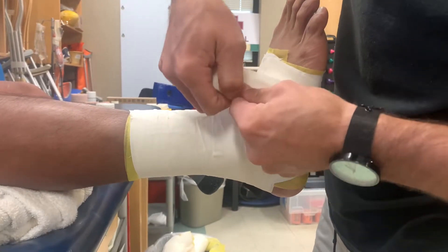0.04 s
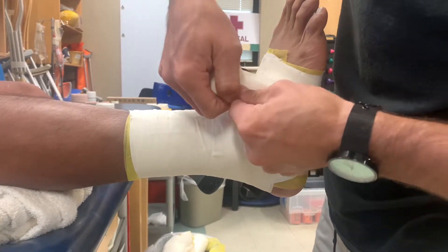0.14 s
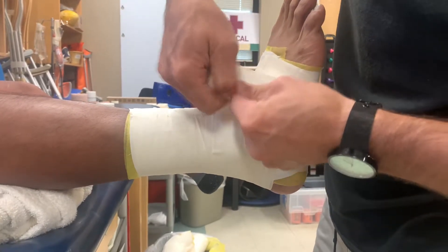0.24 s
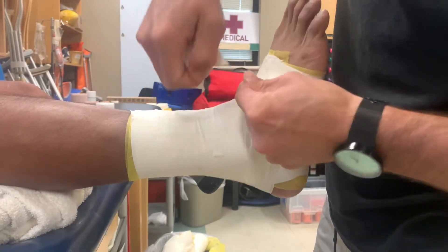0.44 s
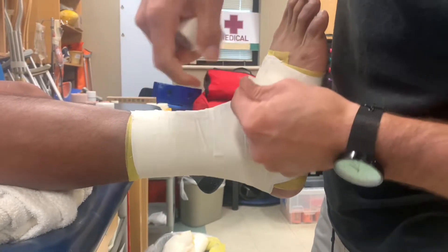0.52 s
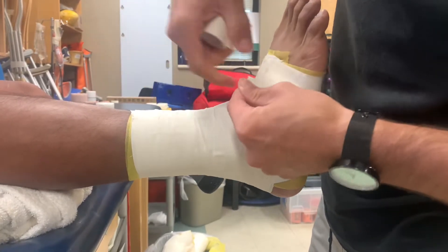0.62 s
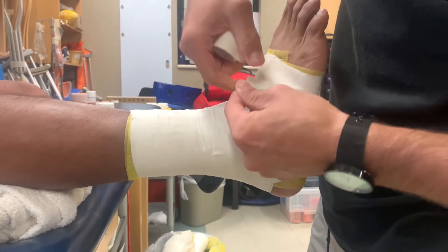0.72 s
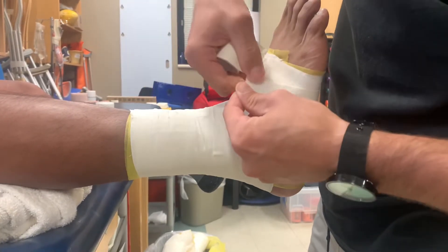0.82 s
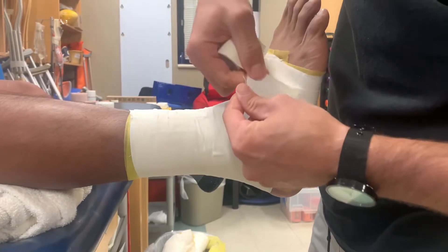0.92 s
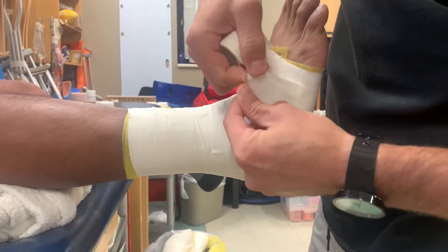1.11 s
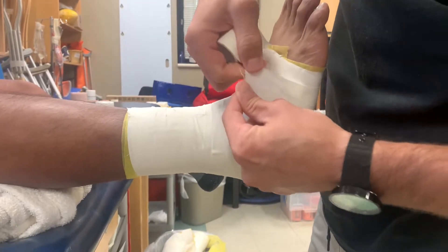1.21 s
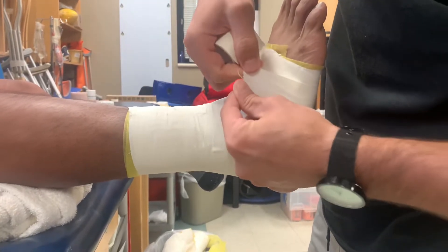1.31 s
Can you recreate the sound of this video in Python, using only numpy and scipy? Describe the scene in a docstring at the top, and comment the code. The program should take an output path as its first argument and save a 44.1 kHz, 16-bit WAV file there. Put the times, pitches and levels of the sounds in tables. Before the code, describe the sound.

Cloth athletic tape ticks faintly as it is pulled tight, then tears by hand in one sharp, very short rip at about 0.2 seconds, close to the microphone. Faint sticky rasps follow around 0.4 seconds and again from 0.8 to 1.0 seconds as more tape peels off the roll. A low ventilation hum and rumble continue quietly throughout in the small room.

```python
"""In a small treatment room, cloth athletic tape is ripped across by hand, close to a phone.
The tape ticks as it is pulled tight. The tear runs through the weave in about 60 ms: thread after
thread snaps, the tight cloth rings and the freed end flaps. Afterwards the glue rasps faintly as
more tape peels off the roll. Ventilation drones underneath, in the room's low rumble."""
import sys
import numpy as np
from scipy import signal
from scipy.fft import rfft, irfft
from scipy.io import wavfile
from scipy.ndimage import uniform_filter1d

SR = 44100
rng = np.random.default_rng(int(sys.argv[2]) if len(sys.argv) > 2 else 0)


def materialize(psi):
    """Save the field psi as 16-bit PCM at rate SR to the path in sys.argv[1].

    A 1-D psi becomes a single channel; in a 2-D psi each row is a channel.
    """
    bounded = np.clip(np.atleast_2d(psi).T, -1, 1)
    quanta = np.round(bounded * 32767).astype(np.int16)
    wavfile.write(sys.argv[1], SR, quanta)


N = 59535
T = np.arange(N) / SR
HZ = np.fft.rfftfreq(2 * N, 1 / SR)

# The ventilation's two hum notes and the tone of its hiss (f/Hz, relative level/dB)
HUM_NOTES = [(48.8, -1.5), (145, -16)]
HISS_TONE = [(200, 5), (1000, 5.5), (2000, 2), (4500, -2.5), (7000, -7.5), (8500, -4), (11000, 1),
             (11400, 7), (11800, 4), (12500, 5.5), (14000, -4), (15500, -1)]
# How the hum wavers (t/s, level/dB)
HUM_SWELL = [(0.02, -46.5), (0.246, -46.5), (0.274, -64), (0.376, -43.5), (0.414, -61.5), (0.442, -41.5),
             (0.654, -41), (0.68, -41.5), (0.808, -52.5), (0.85, -40), (0.916, -51), (1.0, -43.5),
             (1.132, -35.5), (1.172, -51.5), (1.208, -45.5), (1.33, -47.5)]
# Low rumble of the room (f/Hz, relative level/dB)
RUMBLE_TONE = [(15, -12.5), (30, -13), (45, -3.5), (60, 3), (80, -8.5), (125, -6.5), (170, -14), (240, -20),
               (320, -31), (500, -43.5), (1000, -54.5), (3000, -69.5)]
# It swells slightly near the end as an arm moves (t/s, relative level/dB)
RUMBLE_SWELL = [(0, -1.5), (.3, 1), (.55, -2.5), (.8, -0.5), (1.0, -2), (1.2, 1.5), (1.35, 1)]

# Time the room's echo takes to fade by 60 dB (f/Hz, t/s)
ECHO_TIME = [(300, 0.15), (1500, 0.35), (4000, 0.3472), (8000, 0.3354), (15000, 0.32)]
# Strength of that echo (f/Hz, level/dB)
ECHO_LEVEL = [(200, -16), (500, -15.5), (1300, -9.5), (2300, -16), (3100, -11.5), (3950, -22),
              (4400, -18.5), (5200, -13), (7500, -24.5), (9000, -25), (12000, -19), (15000, -23.5)]
# The phone's stereo image: left minus right in phase (f/Hz, phase/rad)
STEREO_PHASE = [(20, -2.5), (500, 0.84), (1300, 1.5), (2600, 3), (3300, 4.5), (3900, 4.5), (4500, 6),
                (5400, 3.5), (6200, 4.5), (6800, 7), (8500, 2.5), (9600, 1.5), (10500, 1), (11400, 0.44),
                (13300, -3.5), (14500, -4.5), (15400, -6.5)]
# Left minus right in level (f/Hz, level/dB)
STEREO_BALANCE = [(60, -3), (600, -1), (1300, 1), (2100, -1), (3000, -1.5), (4200, -1.5), (5200, -1),
                  (5900, -7.5), (7000, 0.5), (15000, 0)]
# Share of the sound from all around that differs between left and right (f/Hz, level/dB)
STEREO_WIDTH = [(100, -16.5), (500, -6), (1200, 0), (6000, 2), (7500, -14.5), (9000, -20.5), (15000, -15.5)]

# Glue ticking under strain (t/s, level/dB)
GLUE_TICKS = [(.054, -63.5), (.128, -56), (.156, -61.5), (0.162, -47), (0.874, -62), (0.991, -54)]
# Short peels (peak t/s, rise t/s, fall t/s, fizz level/dB, rasp level/dB, airy level/dB)
GLUE_PEELS = [(0.356, 0.0044, .005, -52, -83, -58.5), (.406, 0.0098, 0.0087, -49, -62.5, -70),
              (0.754, .02, 0.047, -79.5, -78, -88), (0.875, 0.02, 0.043, -61, -60.5, -61),
              (0.967, 0.0093, 0.032, -59, -63.5, -54.5), (.990, 0.011, 0.015, -70.5, -66, -61),
              (1.20, 0.04, 0.12, -86.5, -82.5, -86)]
# Tone of a tick and of a peel's fizz, rasp and airy top (f/Hz, relative level/dB)
TICK_TONE = [(300, -23), (1200, -8), (3000, 9), (4800, -6), (6000, -2.5), (7000, -7), (7800, 0.5),
             (10000, -8), (12500, -0.5), (14400, 1.5), (15800, -5.5)]
FIZZ_TONE = [(1000, -62), (4000, -10), (6000, -2.5), (7200, -12), (8800, -6), (10600, 0.5), (12200, -5),
             (13300, -1), (15000, -8)]
RASP_TONE = [(300, -12), (800, -13), (1300, -3.5), (2000, 1.5), (2700, 7), (3700, -1), (4500, -5.5),
             (7000, -18), (15000, -18)]
AIRY_TONE = [(8000, -23), (12500, -13), (13400, -2), (14700, -2.5), (15800, -5.5)]

# Flaps of the loosening end (t/s, level/dB)
END_FLAPS = [(.2185, -45), (0.2288, -39.5), (.2367, -35), (0.2481, -23), (0.2548, -39.5)]
# Fine fibres tearing, then single strong threads snapping (t/s, crack level/dB, ring level/dB)
FIBRE_LEVELS = [(0.179, -71.5, -67.5), (0.19, -50.5, -48), (.196, -36, -32), (.202, -14, -34),
                (.214, -21.5, -23), (.231, -18, -28), (.240, -22.5, -31.5), (.251, -28.5, -30),
                (.257, -32, -40.5), (0.264, -53.5, -53)]
THREAD_SNAPS = [(.2000, -21.5, -36.5), (0.2019, -16.5, -34.5), (0.2045, -7.5, -28.5), (.2060, -8.5, -28.5),
                (.2072, -15, -24), (.2084, -13.5, -31.5), (.2115, -22, -19.5), (.2170, -14, -21.5),
                (.2190, -15.5, -10.5), (.2234, -23, -19.5), (.2277, -16, -16.5), (.2286, -8.5, -11.5),
                (.2312, -16.5, -23), (.2336, -16, -26.5), (.2374, -19.5, -24.5), (.2442, -25, -27.5),
                (.2460, -18, -22), (.2530, -27.5, -38)]
# Tone of a flap, a crack and the ringing cloth (f/Hz, relative level/dB)
FLAP_TONE = [(80, -29.5), (200, -17.5), (320, -2.5), (450, 3.5), (650, 0.5), (1000, -7.5), (2000, -22.5),
             (8000, -52)]
CRACK_TONE = [(300, -36), (1200, -21.5), (3000, -8.5), (5500, -13.5), (6400, -6.5), (7200, -1.5),
              (7600, -2.5), (8100, 1.5), (9300, 0.5), (10500, 1.5), (12000, -6), (13300, 0), (15500, -3)]
RING_TONE = [(250, -26.5), (800, -18), (1200, -10.5), (1700, -3.5), (2200, -0.5), (3000, -9), (3500, -3.5),
             (3850, 8), (4300, 4), (5200, -9.5), (6000, -2.5), (7500, -17), (15000, -27.5)]


def gain(db):
    """Turn decibels into a number to multiply by."""
    return 10 ** (np.asarray(db) / 20)


def at_hz(table, hz=HZ):
    """Read between a table's rows, with octaves evenly spaced."""
    freqs, values = np.array(table, float).T
    return np.interp(np.log(np.maximum(hz, 1)), np.log(freqs), values)


def filtered(x, response):
    """Scale and shift each frequency of a sound."""
    return irfft(rfft(x, 2 * N) * response)[..., :N]


def colour(x, tone):
    """Give a sound a tone, using a filter that keeps white noise equally strong."""
    curve = gain(at_hz(tone))
    curve /= np.sqrt(np.mean(curve ** 2))
    # Fold the filter so it rings only after a click, never before.
    cepstrum = irfft(np.log(curve))
    cepstrum[1:N] *= 2
    cepstrum[N + 1:] = 0
    return filtered(x, np.exp(rfft(cepstrum)))


def drift(rate_hz):
    """A slow random wobble, about 1 in size."""
    wobble = filtered(rng.standard_normal(N), np.exp(-(HZ / rate_hz) ** 2))
    return wobble / wobble.std()


def crackle(per_s, scatter_db):
    """Tiny uneven clicks at random moments, steady in power over 10 ms."""
    clicks = (rng.random(N) < per_s / SR) * rng.choice([-1, 1], N)
    clicks = clicks * gain(scatter_db * rng.exponential(size=N))
    power = np.abs(uniform_filter1d(clicks ** 2, size=441))
    return clicks / np.sqrt(power + 1e-9)


def bursts(times, levels_db, decay_s, click_share):
    """Each burst puts a share of its energy in one click and the rest in fading noise."""
    out = np.zeros(N)
    for start, db in zip(times, levels_db):
        fade = (T >= start) * np.exp(-np.abs(T - start) / decay_s)
        burst = fade * rng.standard_normal(N)
        burst *= np.sqrt((1 - click_share) / np.sum(burst ** 2))
        burst[np.argmax(fade)] += np.sqrt(click_share)
        out += gain(db) * burst * np.sqrt(np.sum(fade ** 2))
    return out


def stereo_image(x):
    """The phone's stereo image: left and right differ in phase and level at each pitch."""
    left = gain(at_hz(STEREO_BALANCE) / 2) * np.exp(.5j * at_hz(STEREO_PHASE))
    return filtered(x, np.array([left, 1 / left]))


def all_around(pair):
    """Blend two signals to surround the listener: wide in the midrange, narrow in bass and treble."""
    width = np.clip(gain(at_hz(STEREO_WIDTH)), 0, 1)
    side = filtered(pair[1], width)
    stereo = pair[0] + np.array([side, -side])
    return stereo_image(filtered(stereo, 1 / np.sqrt(1 + width ** 2)))


def background():
    """The ventilation's wavering hum and faint hiss, with the low rumble of the room."""
    swell = lambda table: gain(np.interp(T, *np.array(table).T))
    hum = np.zeros(N)
    for hz, db in HUM_NOTES:
        strength = np.sqrt(2) * gain(db + 2.5 * drift(rate_hz=7.1))
        hum += strength * np.sin(2 * np.pi * hz * T + 0.42 * drift(rate_hz=9.8))
    mid, side = colour(rng.standard_normal((2, N)), RUMBLE_TONE) * gain(-49) * swell(RUMBLE_SWELL)
    hiss = colour(rng.standard_normal((2, N)), HISS_TONE) * gain(-78)
    left_right = np.array([[1], [-1]])
    drone = (hum * swell(HUM_SWELL) + mid) * gain(-1.5 * left_right / 2)  # louder on the right
    return drone + gain(-8.5) * left_right * side + all_around(hiss)


def room_echo(x):
    """Sound bounces quickly off hands and leg, then dies away in the small room."""
    near = rng.standard_normal((2, N)) * np.exp(-T / 0.0058)
    echo = gain(-6) * near / np.sqrt(np.sum(near ** 2) / 2)
    noise = rng.standard_normal((2, N))
    build_up = 1 - np.exp(-T / 0.0054)
    for low_hz in 2. ** np.arange(7, 15):  # one octave at a time
        fade_s = at_hz(ECHO_TIME, low_hz * np.sqrt(2))
        fade = np.exp(-np.log(1000) * T / fade_s) * build_up
        octave = (HZ >= low_hz) * (HZ < 2 * low_hz)
        echo += filtered(noise, octave * gain(at_hz(ECHO_LEVEL))) * fade / np.sqrt(np.sum(fade ** 2))
    return filtered(x, rfft(echo, 2 * N))


def glue():
    """Strands of glue let go in single ticks and short, crackling peels."""
    ticks = bursts(*np.array(GLUE_TICKS).T, decay_s=0.0021, click_share=.25)
    out = colour(ticks, TICK_TONE)
    peak, rise, fall, *levels = np.array(GLUE_PEELS).T[..., None]
    swells = np.exp(-np.where(T < peak, ((T - peak) / rise) ** 2, (T - peak) / fall))
    for db, tone in zip(levels, (FIZZ_TONE, RASP_TONE, AIRY_TONE)):
        strength = np.sum(gain(db) * swells, axis=0)
        out += colour(strength * crackle(per_s=2900, scatter_db=3), tone)
    return out


def loose_end():
    """The freed end makes dull flaps, strongest as the last threads let go."""
    flaps = bursts(*np.array(END_FLAPS).T, decay_s=.0025, click_share=1)
    return colour(flaps, FLAP_TONE)


def fibres(times, levels_db):
    """Fine fibres break in a dense crackle while the tear runs."""
    tearing = (T > times[0]) * (T < times[-1])
    return gain(np.interp(T, times, levels_db)) * tearing * crackle(per_s=5000, scatter_db=2.5)


def tear():
    """Fine fibres crackle, strong threads snap, and both set the tight cloth ringing."""
    times, crack_db, ring_db = np.array(FIBRE_LEVELS).T
    snap_times, snap_db, snap_ring_db = np.array(THREAD_SNAPS).T
    cracks = fibres(times, crack_db) + bursts(snap_times, snap_db, decay_s=.0008, click_share=.15)
    rings = fibres(times, ring_db) + bursts(snap_times, snap_ring_db, decay_s=.0008, click_share=.33)
    return colour(cracks, CRACK_TONE) + colour(rings, RING_TONE)


def scene():
    """The tape up close, its echo and the room's background."""
    tape = tear() + loose_end() + glue()
    return stereo_image(tape) + all_around(room_echo(tape)) + background()


def record(dry):
    """The phone cuts off the treble above 15900 Hz."""
    return signal.sosfilt(signal.ellip(10, .2, 70, 15900, fs=SR, output="sos"), dry)


dry = scene()
out = record(dry)
materialize(out)
```